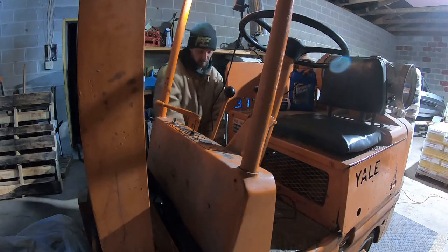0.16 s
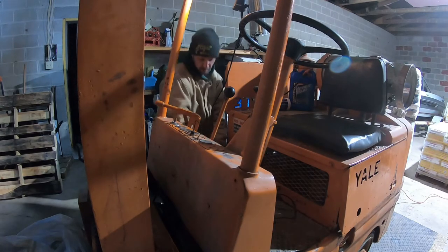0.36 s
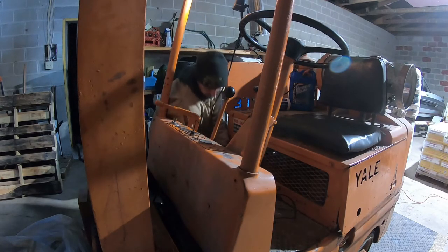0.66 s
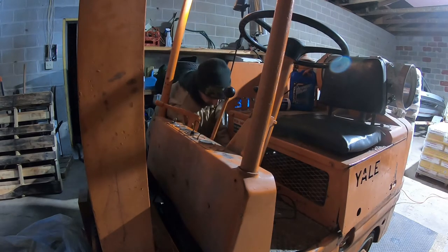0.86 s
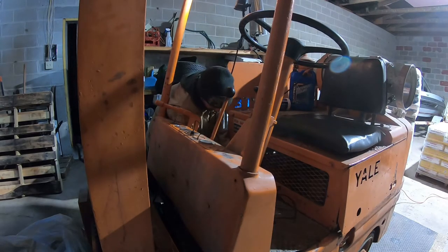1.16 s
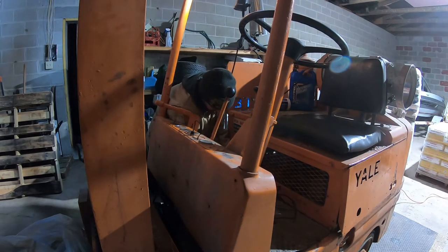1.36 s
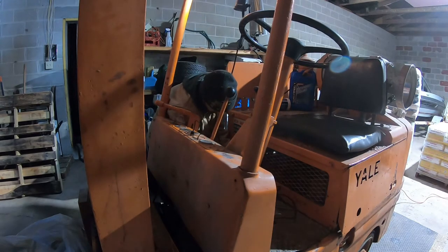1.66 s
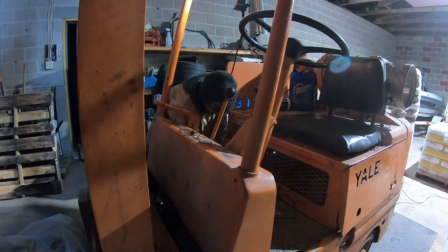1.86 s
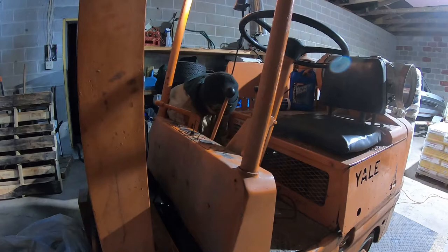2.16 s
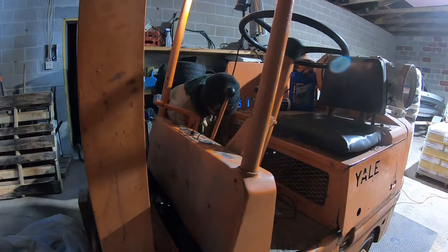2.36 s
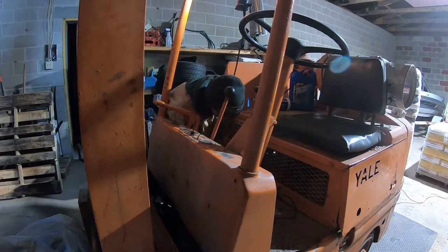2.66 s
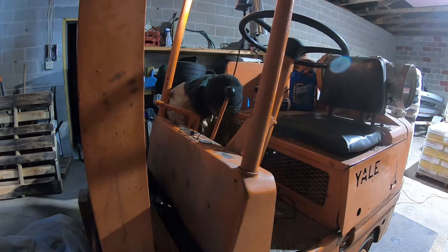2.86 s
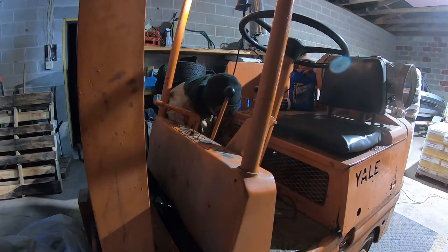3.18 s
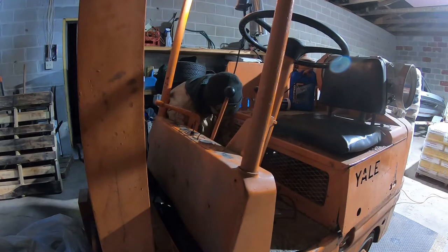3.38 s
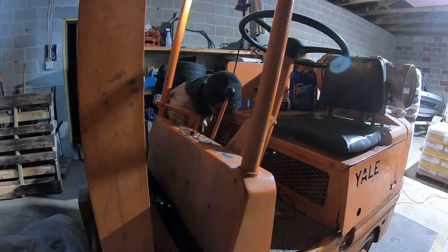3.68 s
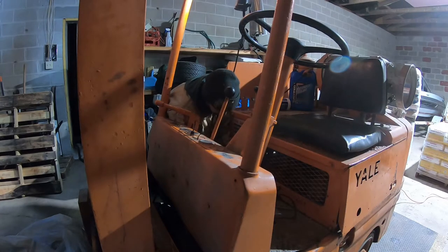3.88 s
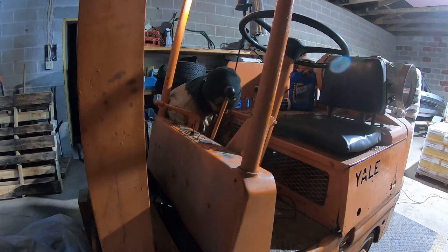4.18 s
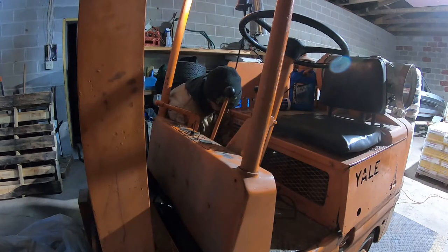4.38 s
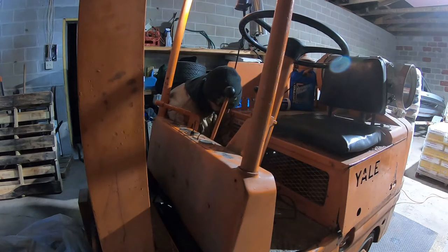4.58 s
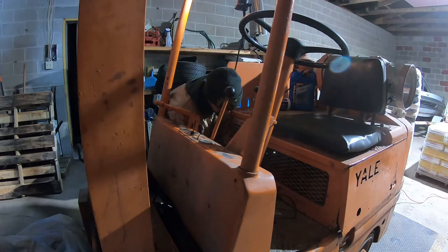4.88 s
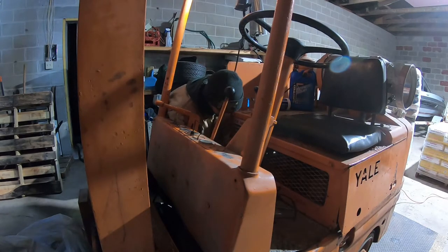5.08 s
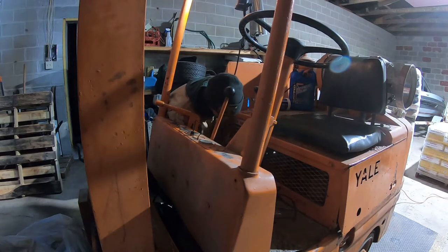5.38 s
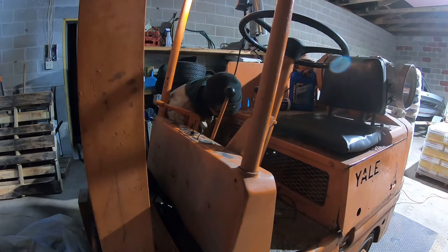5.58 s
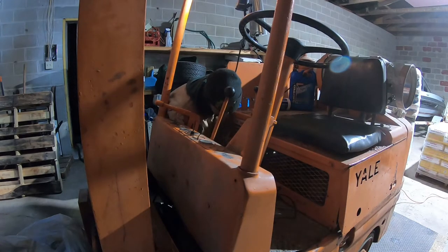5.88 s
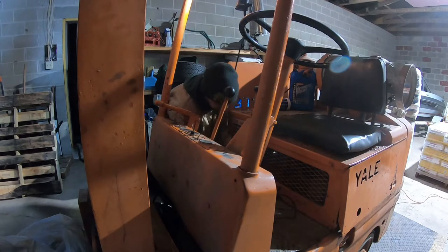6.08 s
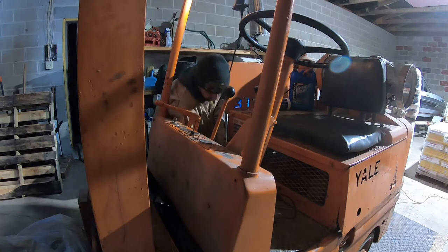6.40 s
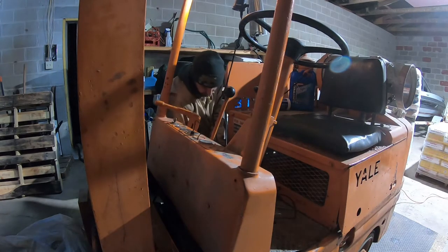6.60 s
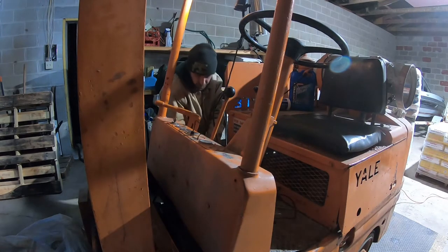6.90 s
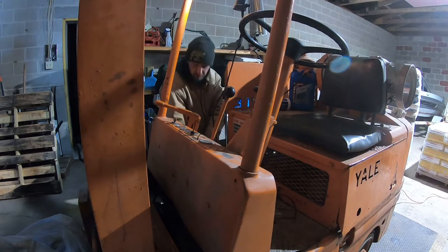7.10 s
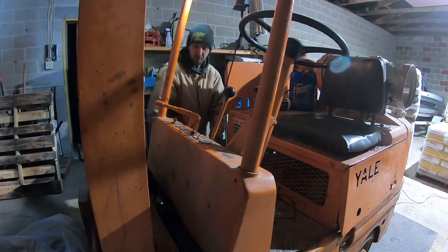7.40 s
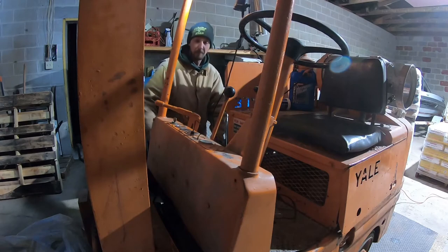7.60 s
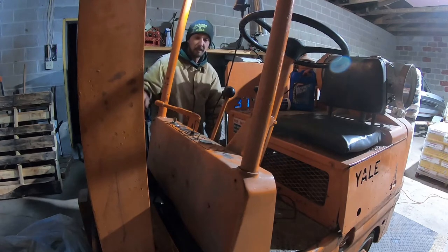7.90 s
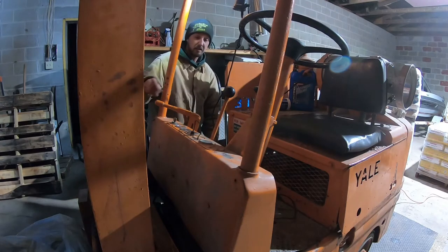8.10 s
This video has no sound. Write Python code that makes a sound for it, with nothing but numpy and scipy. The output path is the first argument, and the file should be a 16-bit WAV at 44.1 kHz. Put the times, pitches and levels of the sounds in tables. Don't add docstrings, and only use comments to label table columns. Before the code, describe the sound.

Coat rustle and boot scuffs, then a failed starter whine winding down, a second crank, and an old four-cylinder engine running steadily in a shop.

```python
import sys
import numpy as np
from scipy import signal
from scipy.fft import rfft, irfft, next_fast_len
from scipy.io import wavfile

SR = 44100
rng = np.random.default_rng(int(sys.argv[2]) if len(sys.argv) > 2 else 0)


def transcribe(u):
    v = np.clip(np.atleast_2d(u).T, -1, 1)
    q = np.round(v * 32767).astype(np.int16)
    wavfile.write(sys.argv[1], SR, q)


def nominal_scale(level):
    x = np.asarray(level, float) / 20
    return 10 ** x


N = 363825


def in_time(rows, fade_s=0.033):
    s, *columns = np.transpose(rows)
    t = np.arange(N) / SR
    gate = np.clip(np.minimum(t - s[0], s[-1] + fade_s - t) / fade_s, 0, 1)
    return [gate] + [np.interp(t, s, c) for c in columns]


def ramp(start_s, length_s):
    return np.clip((np.arange(N) / SR - start_s) / length_s, 0, 1)


def at_hz(points, hz):
    table_hz, value = np.array(points).T
    return np.interp(np.log(hz), np.log(table_hz), value)


def rms_one(x):
    return x / np.sqrt(np.mean(x[-N // 4:] ** 2) + 1e-20)


def drift(rate_hz):
    r = np.exp(-80 * np.pi * rate_hz / SR)
    slow = signal.lfilter([1], [1, -2 * r, r * r], rng.standard_normal(N // 40 + 2002))[2000:]
    return np.interp(np.arange(N) / 40, np.arange(len(slow)), slow / slow.std())


def ring(x, hz, t60_s):
    r, w = nominal_scale(-60 / (t60_s * SR)), 2 * np.pi * hz / SR
    return signal.lfilter([0, np.sin(w)], [1, -2 * r * np.cos(w), r * r], x + 1e-18)


def dying(times_s, heights, t60_s):
    clicks = np.zeros(N) + 1e-18
    np.add.at(clicks, (np.asarray(times_s) * SR).astype(int), heights)
    return signal.lfilter([1], [1, -nominal_scale(-60 / (t60_s * SR))], clicks)


def low_pass(x, hz):
    return signal.sosfilt(signal.butter(2, hz, fs=SR, output="sos"), x)


# hz, likeness [0-1]
LIKENESS = [(60, 0.89), (130, 0.84), (290, 1), (640, 0.75), (1410, 0.19), (3100, 1), (6820, 0.054),
            (15000, 0.02)]
# hz, level_db
LEAN = [(60, -2.5), (180, 0), (550, -2.5), (1650, -5), (4970, 0.5), (15000, -5)]


def diffuse(layers, patchy_db):
    edges_hz = 36 * 2 ** np.arange(0, 9.2, .4)
    centres_hz, widths_hz = np.sqrt(edges_hz[1:] * edges_hz[:-1]), np.diff(edges_hz)
    colours = [nominal_scale(at_hz(colour, centres_hz)) for colour, envelope, lean in layers]
    colours = np.array([c / np.sqrt(np.sum(c ** 2 * widths_hz) * 2 / SR) for c in colours])
    powers = np.array([envelope[::8] ** 2 for colour, envelope, lean in layers])
    leans = np.array([lean for colour, envelope, lean in layers])
    white, out = rng.standard_normal((2, 2, N)), 0
    for k, hz in enumerate(centres_hz):
        band = signal.butter(2, edges_hz[k:k + 2], "band", fs=SR, output="sos")
        mid, side = signal.sosfilt(band, white[k % 2])
        alike = np.clip(at_hz(LIKENESS, hz), 0, 1)
        shares = colours[:, k] ** 2 * nominal_scale(np.outer([1, -1], leans * at_hz(LEAN, hz)))
        gain = np.sqrt(shares @ powers / 2) * nominal_scale(patchy_db * drift(11.7)[::8])
        gain = np.repeat(gain, 8, axis=1)[:, :N]
        out = out + gain * (np.sqrt(1 + alike) * mid + np.sqrt(1 - alike) * side * [[1], [-1]])
    return out


# hz, level_db [dB per Hz]
SHOP_COLOUR = [(15, -49), (25, -10.5), (64, -35.5), (95, -22.5), (112, -10.5), (128, -4.5), (150, -5.5),
               (257, -20.5), (588, -32.5), (729, -10.5), (1030, -29.5), (4620, -40), (15000, -51)]


def room_tone():
    return SHOP_COLOUR, nominal_scale(-67) * np.ones(N), .3


# hz, level_db [dB per Hz]
RUSTLE_COLOUR = [(240, -7), (400, -8), (907, -1.5), (1540, -0.5), (5190, -9), (7470, -14), (9520, 0.5),
                 (11600, -37), (15000, -41)]
# hz, level_db [dB per Hz]
SHUFFLE_COLOUR = [(59, -56), (100, -19.5), (155, 0.5), (253, 6.5), (455, -8), (700, -7), (910, -38),
                  (1540, -120)]
# start_s, rustle_db
MOVING = [(0.0, -60), (0.08, -55.5), (0.22, -60.5), (0.43, -57), (0.46, -47.5), (0.5, -52), (1.09, -59.5),
          (1.13, -65), (1.27, -61.5), (1.66, -68.5), (1.73, -75.5), (2.1, -70), (2.25, -76.5),
          (2.66, -73.5)]
# start_s, level_db
SCUFFS = [(0.36, -59), (0.44, -68), (0.83, -53), (0.93, -60), (1.03, -58), (1.25, -75), (1.63, -64),
          (2.08, -71), (2.27, -80), (2.55, -67)]


def coat_and_boots():
    moving, rustle_db = in_time(MOVING, fade_s=0.2)
    moving[:SR] = 1
    s, db = np.transpose(SCUFFS)
    scuffs = low_pass(dying(s, nominal_scale(db), t60_s=0.3), 42)
    rustle = moving * nominal_scale(rustle_db) + 0.15 * scuffs
    shuffle = moving * nominal_scale(rustle_db - 10) + scuffs
    return [(RUSTLE_COLOUR, rustle, .3), (SHUFFLE_COLOUR, shuffle, .1)]


# start_s, peak_db
TAPS = [(0.4554, -63.5), (0.5197, -40), (0.8344, -48), (1.4596, -52), (1.6452, -68), (3.3394, -28.5),
        (4.2244, -29), (5.2238, -63)]
# start_s, peak_db, rattle_t60_s, thump_db
BLOWS = [
    (2.688, -30.5, 0.27, -8),
    (2.726, -6.5, 0.013, -19.5),
    (2.846, -10.5, 0.054, -13),
    (2.861, -8, 0.034, -11.5),
    (5.321, -23, 0.037, -23),
    (5.344, -13.5, 0.027, -34),
    (5.367, -9.5, 0.12, -1.5),
]
# pitch_hz, level_db, t60_s
HOUSING = [(409, -7, .2), (598, -1, .35), (748, -1, .25), (955, -4, .22), (1200, -2, .16), (1600, -6, .14),
           (2060, -1, .2), (2400, -4, .2), (3150, -3, .2), (3750, -9, .16), (4274, -10, .12)]
# pitch_hz, level_db, t60_s
PANELS = [(113, -2, .3), (180, 3, .1), (266, -6, .2), (420, -6, .12)]
# hz, level_db [dB per Hz]
CRUNCH_COLOUR = [(120, -8.5), (312, -6), (650, 4), (1060, 3), (1270, -2), (1490, -5), (2070, -6.5),
                 (2870, -7), (4480, -15), (8590, -13.5), (15500, -43.5)]


def blows():
    rattles = np.array([dying([s], nominal_scale(db), t60_s) for s, db, t60_s, low_db in BLOWS])
    mix = nominal_scale(2.0 * rng.standard_normal((len(BLOWS), len(HOUSING))))
    noise = rng.standard_normal(N)
    steel = sum(nominal_scale(db - 37.5) * ring(noise * (mix[:, k] @ rattles), hz, t60_s / 3.0)
                for k, (hz, db, t60_s) in enumerate(HOUSING))
    thump = noise * sum(dying([s], nominal_scale(db + low_db), 0.13) for s, db, t60_s, low_db in BLOWS)
    panels = sum(nominal_scale(db - 36) * ring(thump, hz, t60_s) for hz, db, t60_s in PANELS)
    s, db = np.transpose(TAPS)
    ticks = np.diff(low_pass(dying(s, nominal_scale(db + 5.0), 0.022) * noise, 4300), prepend=0)
    tail = sum(dying([s], nominal_scale(db), .3) for s, db, t60_s, low_db in BLOWS)
    crunch = low_pass(sum(rattles) + nominal_scale(-9) * tail, 110)
    return steel + panels + ticks, (CRUNCH_COLOUR, nominal_scale(-12.5) * crunch, .9)


SPIN_S, KEY_OFF_S = 2.86, 3.332


def starter_speed():
    t = np.maximum(np.arange(N) / SR, SPIN_S)
    start_hz, top_hz, climb_s = 1050, 2000, .255
    climb_hz = top_hz - (top_hz - start_hz) * np.exp((SPIN_S - t) / climb_s)
    coast_hz = 1350 - 1270 * (t - 3.85)
    round_hz = 60
    hz = np.maximum(-round_hz * np.logaddexp(-climb_hz / round_hz, -coast_hz / round_hz), 20)
    stop_s, stop_db_per_s = 4.692, 143
    gate = ramp(SPIN_S, 0.023) * nominal_scale(-stop_db_per_s * np.clip(t - stop_s, 0, 1))
    return gate, hz, 1 - ramp(KEY_OFF_S, 0.3)


def coasting(hz, top_db, knee_hz, db_per_decade):
    return nominal_scale(top_db + db_per_decade * np.log10(np.minimum(hz / knee_hz, 1)))


def whine():
    gate, hz, power = starter_speed()
    sing = nominal_scale(-32) / (1 + ((hz - 1700) / 100) ** 2) ** .6
    free = (1 - power) * coasting(hz, -51.5, 1460, 32)
    shaft = 2 * np.pi * np.cumsum(hz * (1 + .005 * drift(25))) / SR / 23
    bar_gain = power ** 2 * sing + free * ramp(KEY_OFF_S, .5) ** 2
    bars = bar_gain * nominal_scale(2 * drift(16)) * np.sin(23 * shaft)
    over = power * nominal_scale(-57) + free * nominal_scale(1)
    for k, db in [(2, 0), (3, -1), (4, -1)]:
        case = 1 + (k * hz / 3700) ** 8
        bars += over * nominal_scale(db + 4 * drift(12)) / case * np.sin(23 * k * shaft)
    orders_db = [-14, -3, 2, -3, -6, -9]
    shake = sum(nominal_scale(db - 3 + 3 * drift(5)) * np.sin(k * shaft) for k, db in enumerate(orders_db, 1))
    return gate * (bars + coasting(hz, -45.5, 1700, 52) * shake)


def rings(envelope, bands):
    noise = rng.standard_normal(N)
    return envelope * sum(nominal_scale(db) * rms_one(ring(noise, hz, np.log(1000) / np.pi / width_hz))
                          for hz, width_hz, db in bands)


# start_s, grind_db
CRANK = [
    (5.33, -27.5),
    (5.374, -25.5),
    (5.42, -33),
    (5.534, -23.5),
    (5.592, -27.5),
    (5.746, -23),
    (5.896, -25.5),
    (6.1, -33.5),
    (6.14, -67),
]
# hz, level_db [dB per Hz]
GRIND_COLOUR = [(76, -47.5), (130, -10), (158, 4.5), (204, -21), (251, 1.5), (433, -3), (542, 0),
                (1440, -7.5), (2290, -2.5), (4720, -21.5), (6000, -16.5), (7800, -47.5), (13200, -120)]
# pitch_hz, width_hz, level_db
GEAR_RINGS = [(1570, 35, -6.5), (1813, 61, -3.5), (2060, 110, -3.5), (2305, 160, 0), (3130, 110, -3.5)]
# hz, level_db [dB per Hz]
BRUSH_COLOUR = [(710, -33), (1200, -2), (1470, -9.5), (2160, -8.5), (3210, 5.5), (3940, -3), (5200, 11),
                (7000, -4), (8800, 8), (11000, -18.5), (15500, -1)]
# pitch_hz, width_hz, level_db
BRUSH_RINGS = [(2250, 180, -11.5), (3195, 200, -10), (5170, 120, -13.5), (5870, 280, -12), (8950, 760, -13)]
# start_s, level_db
SPITS = [
    (5.33, -36.5),
    (5.764, -20.5),
    (6.156, -32),
]


def starter_noise():
    gate, hz, power = starter_speed()
    cranking, crank_db = in_time(CRANK)
    bite = dying([SPIN_S], nominal_scale(-17.5), t60_s=.2)
    free_grind = gate * (power ** 2 * nominal_scale(-34) + coasting(hz, -41, 2580, 13.8))
    grind = (free_grind + bite + cranking * nominal_scale(crank_db)) * nominal_scale(drift(30))
    over_db = -19 + 9.5 * ramp(6.4, 0.017)
    s, db = np.transpose(SPITS)
    spits = dying(s, nominal_scale(db), t60_s=.15)
    hiss = gate * coasting(hz, -44.5, 980, 39.4) + cranking * nominal_scale(crank_db + over_db) + spits
    ringing = rings(hiss, BRUSH_RINGS) + nominal_scale(-10) * rings(grind, GEAR_RINGS)
    return ringing, [(GRIND_COLOUR, grind, .9), (BRUSH_COLOUR, hiss, .9)]


# start_s, width_s, bonnet_db, frame_db, floor_plate_db
SHAKES = [
    (2.9, .04, -47, -37, -40),
    (2.97, 0.071, -28.5, -45, -40.5),
    (3.12, .07, -41, -65, -40),
    (3.36, .06, -62, -68, -60),
    (3.56, 0.08, -52.5, -60, -50),
    (3.85, 0.047, -50.5, -63, -49.5),
    (4.02, 0.081, -37.5, -56, -59.5),
    (4.3, 0.21, -85, -87, -52.5),
]


def plates():
    t = np.arange(0, N, 16) / SR
    swells = sum(np.outer(nominal_scale(np.array(db)), np.exp(-((t - s) / width_s) ** 2)) for s, width_s, *db in SHAKES)
    bonnet_gain, frame_gain, floor_gain = np.repeat(swells, 16, axis=1)[:, :N]
    noise = rng.standard_normal(N)
    bonnet = np.sin(2 * np.pi * np.cumsum(113 + 2.2 * drift(9.9)) / SR)
    frame = rms_one(ring(ring(noise, 71, 0.11), 71, 0.11))
    floor = rms_one(ring(noise, 267, 0.5))
    return ramp(SPIN_S, 0.047) * (nominal_scale(1.5) * bonnet_gain * bonnet + frame_gain * frame + floor_gain * floor)


# start_s, turns_per_s
SPEED = [
    (5.7, 13.03),
    (6.4, 13.4),
    (6.65, 14.89),
    (7.3, 16.12),
    (7.85, 16.65),
    (8.05, 15.89),
    (8.3, 16.97),
]


def moments(turns):
    t = np.arange(SPEED[0][0], SPEED[-1][0], .001)
    passed = np.cumsum(np.interp(t, *np.transpose(SPEED))) * .001
    at_s = np.interp(turns, passed, t + .001)
    return at_s, (turns >= 0) & (at_s < N / SR - .001)


CATCH_S = 5.68
# start_s, level_db
LOAD = [
    (5.68, 6.5),
    (5.9, 8.5),
    (6.15, 1.5),
    (6.45, 3),
    (6.75, 3.5),
    (7.0, -0.5),
    (7.5, -1.5),
    (8.25, 0),
]


def working(idle_db, load_share, hunt_db):
    load_db = in_time(LOAD)[1]
    return ramp(CATCH_S, .07) * nominal_scale(idle_db + load_share * load_db + hunt_db * drift(2.64))


# start_s, peak_db, pitch_hz
PINGS = [(5.484, -18, 1770), (5.7097, -17, 2250), (5.844, -15.5, 1570), (6.0784, -19.5, 2250),
         (6.1562, -16.5, 2180), (6.3034, -22, 2240), (6.5229, -17.5, 1260), (6.6643, -24, 3780),
         (6.7299, -17, 2233), (6.73, -23, 4690), (6.765, -21, 1600), (6.796, -19, 1574),
         (6.9663, -22.5, 1570), (7.0976, -22, 3170), (7.1825, -21, 2073), (7.3051, -22.5, 2230),
         (7.6748, -23, 2220), (7.9778, -25, 3820)]
BRACKETS_HZ = [(1240, 1560, 2020, 2230), (3110, 3770, 3780, 4400)]
# pitch_hz, level_db, t60_s
BLOCK = [(1240, -6, .06), (1580, -2, .08), (2000, -3, .06), (2240, 0, .1), (2380, -3, .08), (2640, -6, .06),
         (3130, -7, .06), (3760, -8, .07), (4200, -13, .04), (4700, -12, .05), (5600, -15, .04),
         (7800, -15, .04)]


def pings():
    out, t = np.zeros(N + SR), np.arange(SR // 8) / SR
    turns = np.arange(6, 39)
    parts_hz, levels_db = [*BRACKETS_HZ, np.transpose(BLOCK)[0]], (-30, -28.5, -29.5)
    picks, spread = rng.random((len(turns), 3)), rng.standard_normal((len(turns), 3, 3))
    on_beat_s = moments(turns)[0]
    off_beat_s = moments(turns + 0.45 + .12 * spread[:, 2, 2])[0]
    struck = []
    for k, times_s in enumerate([on_beat_s, on_beat_s, off_beat_s]):
        for i, s in enumerate(times_s):
            hz = parts_hz[k][int(picks[i, k] * len(parts_hz[k]))] * (1 + .015 * spread[i, k, 1])
            struck.append((s, levels_db[k] + 2.5 * spread[i, k, 0], hz))
    for s, db, hz in [*PINGS, *struck]:
        pair = np.sin(2 * np.pi * hz * t) + 0.61 * np.sin(2 * np.pi * 0.91 * hz * t)
        out[int(s * SR):][:len(t)] += nominal_scale(db - 6 - 60 * t / .09) * np.minimum(t / .005, 1) * pair
    return out[:N]


# start_s, level_db
FIRST_FIRINGS = [
    (5.513, 4),
    (5.56, 0),
    (5.643, 8.5),
]
CYLINDERS_DB = [0, -1, -.5, -1.5]
# pitch_hz, level_db, t60_s
PIPE = [(67.4, 1.5, 0.2), (90.4, -2, 0.33), (123.6, -3.5, 0.13), (169, -6, 0.39), (239.2, -7.5, 0.097),
        (266.3, -11.5, 0.43), (324.8, -9.5, 0.26)]


def exhaust():
    s, inside = moments(np.arange(80) / 2 + 0.199 + 0.016 * rng.standard_normal(80))
    heights = nominal_scale(np.tile(CYLINDERS_DB, 20) + 0.89 * rng.standard_normal(80))
    first_s, first_db = np.transpose(FIRST_FIRINGS)
    all_s, all_heights = np.r_[s[inside], first_s], np.r_[heights[inside], nominal_scale(first_db)]
    puffs = low_pass(dying(all_s, all_heights, 0.022), 474)
    modes = [(-1) ** k * nominal_scale(db) * ring(puffs, hz, t60_s) for k, (hz, db, t60_s) in enumerate(PIPE)]
    boom = signal.sosfilt(signal.butter(4, 45, "high", fs=SR, output="sos"), sum(modes[:3]))
    boom_gain = np.maximum(working(-18.5, 0.3, 0.7), nominal_scale(-27))
    upper_gain = np.maximum(working(-29, 0.45, 1.84), nominal_scale(-52))
    return boom_gain * rms_one(boom) + upper_gain * nominal_scale(0.5) * rms_one(sum(modes[3:]))


# hz, level_db [dB per Hz]
RUMBLE_COLOUR = [(15, -38), (25, 14), (54, -17), (76, -0.5), (91, -3.5), (135, -9.5), (313, -16),
                 (447, -22.5), (608, -22.5), (750, -29.5), (1200, -25), (1560, -60), (2640, -120)]


def rumble():
    return RUMBLE_COLOUR, working(-23.5, -0.17, 2), .1


# start_turn, level_db
VALVES = [(-.03, 0), (.14, -5), (.5, -12), (.63, -10)]
# hz, level_db [dB per Hz]
CLATTER_COLOUR = [(290, -39), (500, -9.5), (815, -2), (1170, -16), (1560, -5.5), (2230, -9.5),
                  (3680, -13.5), (4500, -15.5), (8720, -14.5), (11000, -25), (15500, -23)]


def valve_gear():
    turn, db = np.tile(np.transpose(VALVES), 40)
    s, inside = moments(turn + np.repeat(np.arange(40), 4) + 0.014 * rng.standard_normal(160))
    heights = nominal_scale(db + 1.0 * rng.standard_normal(160))
    throb = rms_one(.33 + dying(s[inside], heights[inside], .15))
    mix, noise = nominal_scale(4.5 * rng.standard_normal((160, len(BLOCK)))), rng.standard_normal(N)
    start, ticks = int(CATCH_S * SR), 0
    for k, (hz, db, t60_s) in enumerate(BLOCK):
        strikes = noise * dying(s[inside], (np.sqrt(heights) * mix[:, k])[inside], 0.019)
        ticks = ticks + nominal_scale(db) * ring(strikes[start:], hz, t60_s)
    ticks = rms_one(np.r_[np.zeros(start), ticks])
    gain = working(-40.5, 1, 1.38)
    return nominal_scale(-3.0) * gain * ticks, (CLATTER_COLOUR, gain * throb * nominal_scale(7.5), .5)


def shop(x):
    t60_s, wall_cut_hz = 0.57, 5300
    size = next_fast_len(N + SR)
    angle, out = -2j * np.pi * np.arange(size // 2 + 1) / size, []
    dull = np.exp(-2 * np.pi * wall_cut_hz / SR)
    walls, sound = (1 - dull) / (1 - dull * np.exp(angle)), rfft(x, size)
    for lags in (rng.uniform(0.0098, .04, (2, 6)) * SR).astype(int):
        loops = [nominal_scale(-60 * d / SR / t60_s) * walls * np.exp(angle * d) for d in lags]
        out.append(irfft(sound * sum(g / (1 - g) for g in loops), size)[:N])
    return np.array(out)


def low_cut(x):
    low, high = (signal.sosfilt(signal.butter(6, 148, kind, fs=SR, output="sos"), x) for kind in ("low", "high"))
    opening = np.clip((np.arange(N) / SR - 5.39) / .03, nominal_scale(-24), 1)
    low_noise = nominal_scale(-85.5) * rms_one(low_pass(rng.standard_normal(N), 90))
    return high + opening * low + low_noise


def scene():
    steel, crunch = blows()
    ringing, starter_layers = starter_noise()
    ticks, clatter = valve_gear()
    layers = [room_tone(), *coat_and_boots(), crunch, *starter_layers, rumble(), clatter]
    noise = diffuse(layers, patchy_db=1.5)
    starter = (steel + whine() + ringing) * nominal_scale([[-1.2], [1.2]])
    engine = (ticks + pings()) * nominal_scale([[-1.5], [1.5]])
    near = starter + engine
    return low_cut(noise + near + nominal_scale(-12.5) * shop(near.mean(axis=0))) + exhaust() + plates()


def top_cut(x):
    return signal.sosfilt(signal.butter(12, 15650, fs=SR, output="sos"), x)


def record(dry):
    dull = signal.sosfilt(signal.butter(6, 9800, fs=SR, output="sos"), dry)
    return top_cut(dull + nominal_scale(-23.5) * dry)


dry = scene()
out = record(dry)
transcribe(out)
```